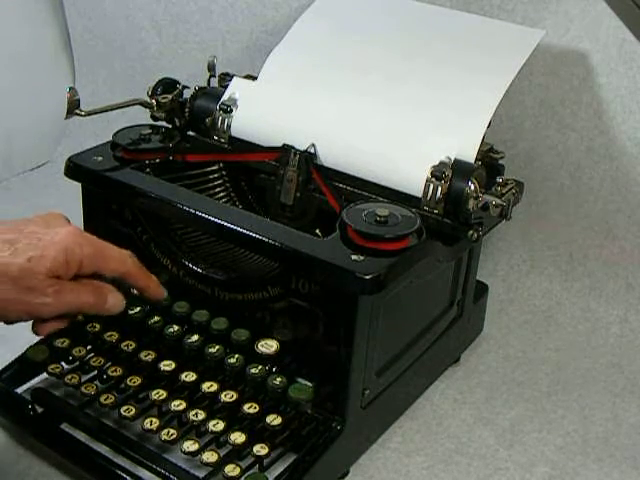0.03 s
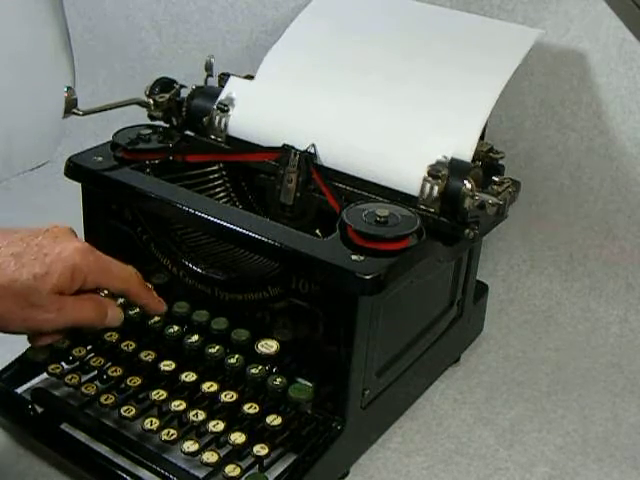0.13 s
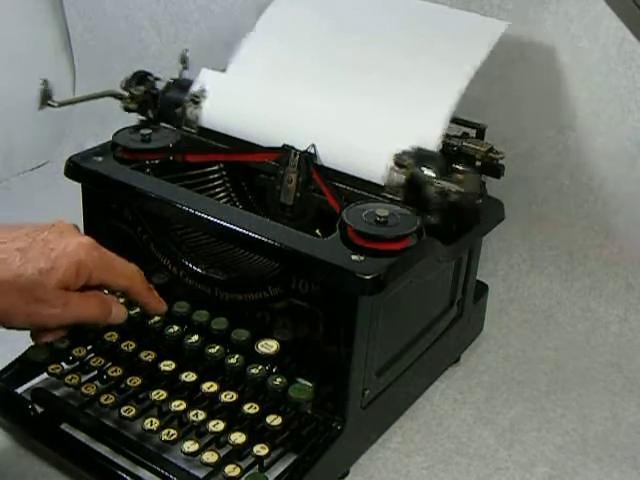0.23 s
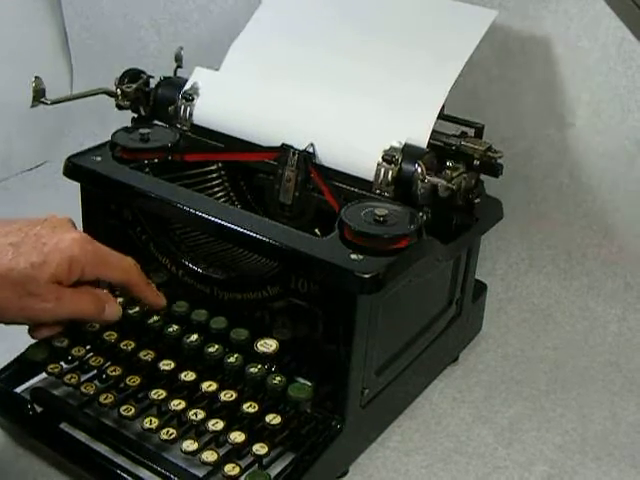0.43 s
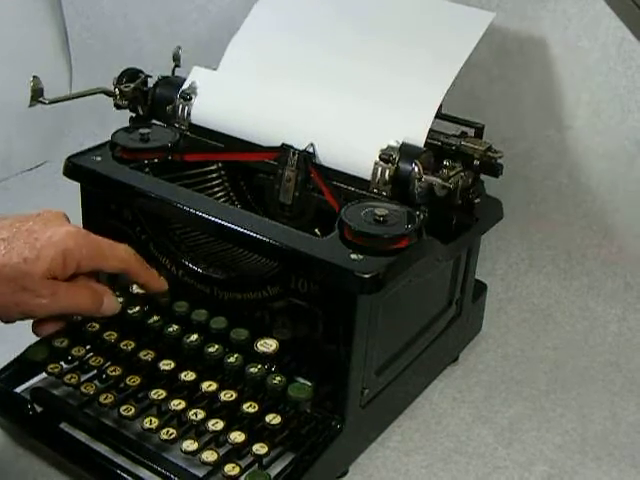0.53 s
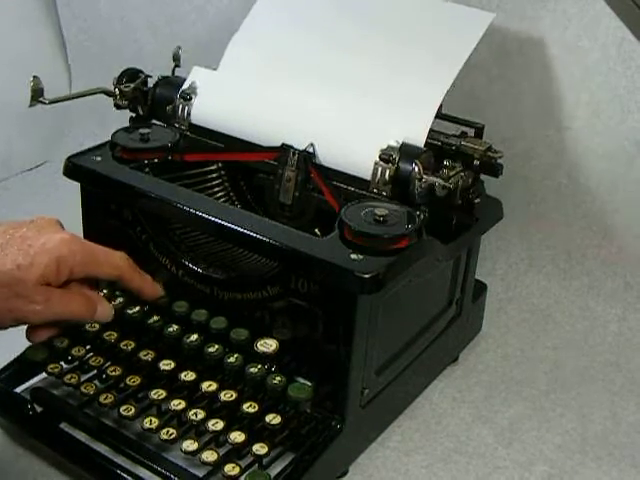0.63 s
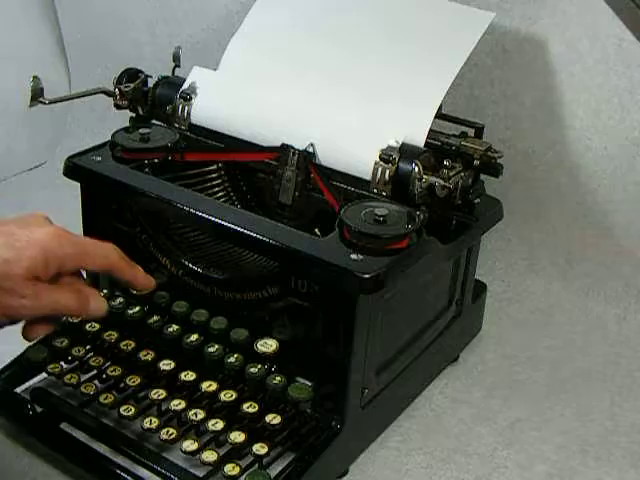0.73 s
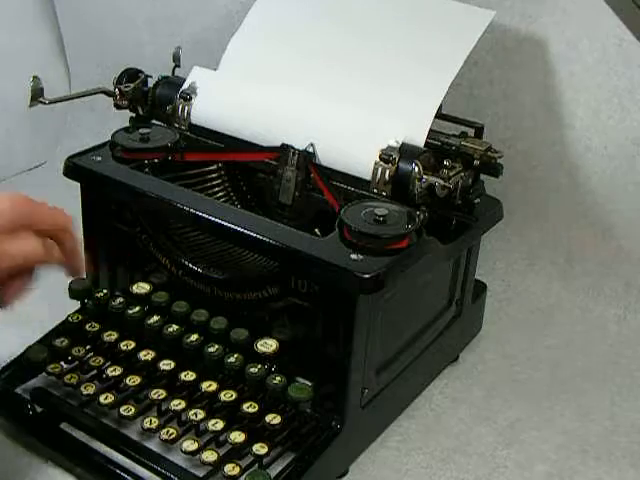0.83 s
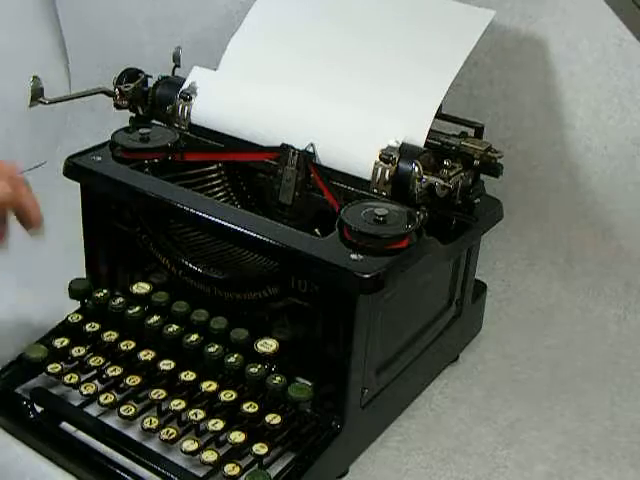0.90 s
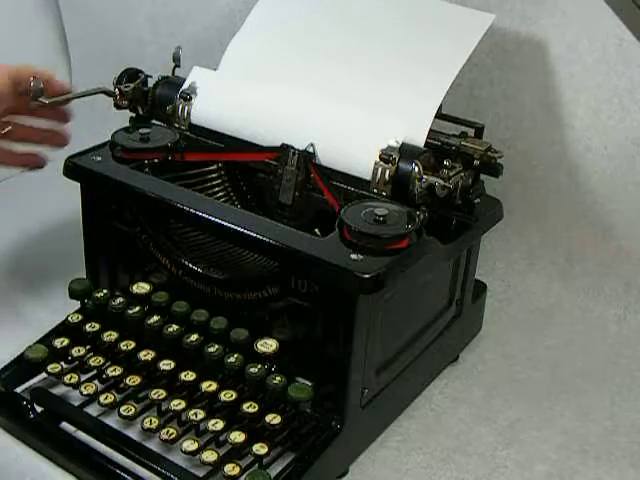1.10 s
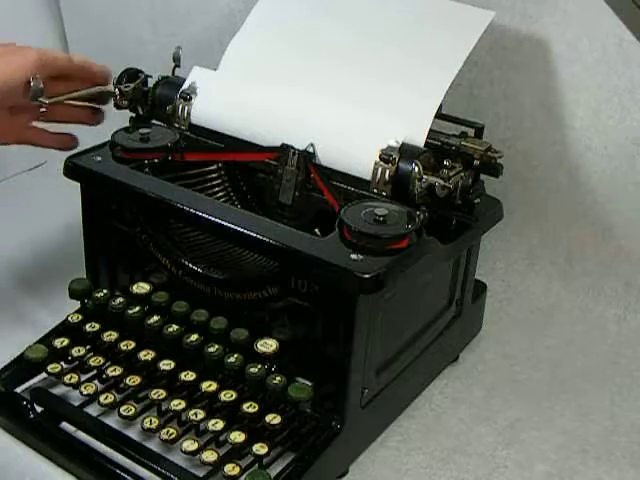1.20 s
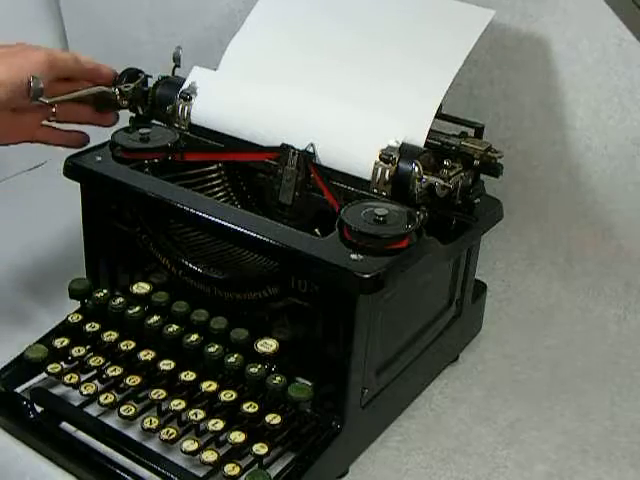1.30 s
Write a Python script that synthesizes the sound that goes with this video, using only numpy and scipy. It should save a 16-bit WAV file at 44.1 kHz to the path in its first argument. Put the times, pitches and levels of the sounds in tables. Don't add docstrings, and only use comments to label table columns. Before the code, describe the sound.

Typewriter key and carriage action: a sharp click, quick ratcheting rattle, a heavy double clack, then another hard clunk, followed by weak ticks and low room murmur, heard through a dull, gritty, low-quality camera microphone.

```python
import sys
import numpy as np
from scipy import signal
from scipy.fft import rfft, irfft, next_fast_len
from scipy.io import wavfile

SR = 44100
rng = np.random.default_rng(int(sys.argv[2]) if len(sys.argv) > 2 else 0)


def level_to_linear(level):
    exponent = np.asarray(level, float) / 20
    return 10 ** exponent


def persist_wave(psi):
    counts = np.round(np.clip(psi, -1, 1) * 32767).astype(np.int16)
    wavfile.write(sys.argv[1], SR, np.atleast_2d(counts).T)


N = 59535

# start in seconds, peak in dB, pitch of the crack in Hz, push into the frame in dB.
BLOWS = [(0.175, -42.5, 1170, -34), (0.2045, -20, 1617, -49.5), (0.209, -21.5, 2740, -34),
         (0.2072, -22, 3445, -41.5), (0.2069, -25, 876, -44), (0.2067, -26.5, 4600, -42),
         (0.2379, -21, 1190, -29.5), (0.257, -23.5, 1250, -32), (0.3048, -29, 2150, -34),
         (0.3276, -27, 1770, -28.5), (0.361, -32.5, 2420, -24.5), (0.3956, -8.5, 2116, -20),
         (0.4111, -12, 1200, -17), (0.43, -21, 1273, -23), (0.463, -21.5, 2580, -32),
         (0.512, -28.5, 1047, -22.5), (0.5856, -25.5, 2490, -43.5), (.6110, -25.5, 2840, -38),
         (.6290, -8, 1436, -13), (0.6421, -29, 2570, -22), (0.6628, -27.5, 1365, -23.5),
         (0.738, -34, 2240, -39), (0.7857, -46, 1970, -33.5), (0.809, -39.5, 1955, -40.5),
         (0.82, -42.5, 1440, -37), (0.8223, -43.5, 3160, -48), (0.8785, -41.5, 2007, -43),
         (0.9185, -46.5, 1890, -42), (1.0235, -52.5, 1550, -40), (1.115, -38, 1770, -42.5),
         (1.18, -38.5, 1641, -51)]
# start in seconds, pitch in Hz, level in dB,
# time to fade by 60 dB in seconds.
PART_RINGS = [(.06, 160, -45, 0.27), (0.34, 170, -25, 0.45), (.240, 527, -25, 0.14), (.245, 705, -31, 0.18),
              (.35, 170, -25, 0.13), (0.44, 180, -20.5, .2), (.41, 645, -20.5, .12),
              (.52, 175, -26.5, 0.55), (0.87, 59, -34.5, .25), (.515, 350, -20.5, .15),
              (0.215, 1030, -27.5, 0.23), (.408, 600, -12.5, 0.15), (0.424, 395, -9.5, 0.08),
              (0.53, 560, -26, 0.16), (0.5, 364, -22.5, 0.18), (.45, 452, -18.5, 0.16),
              (.50, 452, -26, 0.56), (0.46, 390, -18.5, .1), (.41, 232, -22, 0.18), (.56, 292, -31, .3),
              (.42, 1150, -24, 0.28), (.50, 930, -37.5, 1.9), (.636, 166, -15.5, 0.12),
              (.634, 228, -18, 0.15), (.629, 720, -20.5, 0.11), (.632, 1100, -18, 0.071),
              (.632, 1400, -20, 0.13), (.632, 450, -20, 0.14), (.64, 520, -23, 0.13),
              (0.58, 290, -19.5, 0.14), (0.66, 205, -31, 0.24), (.92, 255, -37, 0.36),
              (1.02, 290, -40.5, 0.19), (.69, 450, -28, 0.6), (0.65, 300, -28, 0.46),
              (0.64, 580, -34.5, .2), (.815, 250, -33, 0.17), (.82, 770, -36, 0.2),
              (0.87, 290, -35.5, 0.48)]
# start in seconds, pitch in Hz, level in dB,
# time to fade by 60 dB in seconds.
LEVER_PINGS = [(0.2043, 1680, -31, 0.026), (.2080, 1910, -23, 0.041), (.2085, 3990, -31.5, 0.026),
               (.2085, 4990, -27.5, 0.022), (.2110, 2905, -22, 0.063), (.2200, 2363, -26, 0.091),
               (.242, 2800, -30, 0.046), (.328, 1800, -27, 0.069), (.352, 1766, -29, 0.064),
               (.3955, 1620, -13, 0.029), (.3970, 2410, -9.5, .035), (.408, 1250, -18.5, 0.057),
               (.413, 2484, -22, 0.034), (.430, 2960, -25.5, .03), (.5115, 691, -25.5, 0.076),
               (.5125, 530, -22, .05), (.400, 641, -17.5, .06), (0.4, 331, -17.5, 0.044),
               (.6305, 717, -15, 0.033), (.631, 403, -16, 0.06), (.790, 659.5, -30.5, .06),
               (0.207, 892, -26.5, 0.052), (.612, 2402, -23.5, 0.078), (.6300, 1888, -16, .025),
               (.631, 2510, -21, 0.054), (.739, 3940, -43.5, 0.018), (.8225, 3095, -37, 0.029),
               (.822, 1562, -33, 0.033), (.879, 1998, -40.5, 0.034), (.880, 3000, -44, 0.024),
               (.918, 1883, -40.5, 0.038)]
# time in seconds, load on the frame in dB,
# rattle of the rack above that load in dB.
CARRIAGE_RUN = [(0.165, -69, -2.5), (0.199, -50.5, -20), (0.248, -28, -4), (0.281, -28, -9.5),
                (0.33, -27.5, -4), (0.374, -18.5, -6), (0.422, -19, -5), (0.483, -26.5, -10.5),
                (0.523, -21.5, -16), (.58, -34.5, -6.5), (0.621, -33.5, 4), (0.663, -30, -8),
                (0.721, -38.5, -10.5), (.80, -39.5, -15.5), (0.881, -44.5, -13), (1.0, -53, -16.5)]
# time in seconds, pitch in Hz, level in dB.
RAIL_SONG = [
    (0.205, 338.1, -51),
    (0.213, 338, -35),
    (0.239, 339.6, -37.5),
    (0.249, 346.5, -31.5),
    (0.339, 354.4, -30),
    (0.367, 348.4, -20.5),
    (0.381, 344.3, -25),
    (0.401, 335.6, -25),
    (0.41, 331, -33),
]
# time in seconds, pitch in Hz, level in dB.
RAIL_AFTERSONG = [
    (0.655, 338.1, -33),
    (0.671, 335.6, -24),
    (0.699, 344.1, -26),
    (0.709, 347.6, -35.5),
    (0.755, 352, -32.5),
    (0.759, 353.2, -40.5),
    (1.019, 350.6, -50.5),
    (1.285, 349, -52.5),
    (1.35, 372.4, -57.5),
]
# pitch in Hz, level in dB, time to fade by 60 dB in seconds.
FRAME_MODES = [(110.8, -11, 0.15), (170.3, -4, .11), (229.8, -3.5, 0.088), (297, -6.5, .15),
               (349, -6, 0.092), (375, -5, 0.2), (454, -9.5, 0.1), (510.3, -9, 0.14), (609.6, -8, 0.057),
               (650.5, -11.5, 0.06), (711, -15.5, 0.049), (790, -15.5, 0.037), (890, -21, 0.04),
               (1031, -13.5, 0.041)]
# pitch in Hz, level in dB, time to fade by 60 dB in seconds.
STEEL_MODES = [(1157, -6.5, 0.068), (1263, -6, 0.082), (1366, -7, 0.053), (1478, -8, 0.024),
               (1770, -3.5, 0.041), (2007, -3, 0.074), (2372, -4, 0.053), (2465, -3.5, 0.051),
               (2600, -6, 0.055), (2762, -8.5, 0.07), (2882, -8, .05), (3192, -11.5, 0.045),
               (3540, -14.5, 0.015), (4280, -19.5, 0.032)]
# frequency in Hz, level in dB per Hz.
SNAP_COLOUR = [(180, -31), (300, -5), (586, -0.5), (844, -3), (2460, -8.5), (3180, -12), (4870, -28),
               (5500, -33), (7150, -63), (12100, -120)]
# frequency in Hz, level in dB.
KNOCK_COLOUR = [(59, -72.5), (100, -17.5), (165, -4), (522, -5.5), (617, -4.5), (779, -6.5), (2510, -17),
                (5400, -36.5), (7020, -72), (11900, -120)]
# frequency in Hz, level in dB per Hz.
RACK_COLOUR = [(700, -32), (1500, -3), (2500, 0), (3500, -9), (5000, -27), (7000, -60)]
# frequency in Hz, level in dB.
MURMUR_COLOUR = [(35, -33.5), (60, -16), (151, -1.5), (716, -10.5), (981, -23), (1100, -11.5),
                 (2060, -14.5), (5000, -26.5), (6500, -53), (11000, -120)]
# pitch in Hz, width in Hz, level in dB, gone by in seconds.
MURMUR_RINGS = [(2100, 98, -58.5, 0.2), (3290, 120, -60, 0.19), (347, 45, -54, 9.0),
                (835, 250, -53.5, 0.33), (111.6, 99, -58, 9.0)]


def rms_one(x):
    return x / np.sqrt(np.mean(x ** 2) + 1e-20)


def ring(force, hz, t60):
    shrink = level_to_linear(-60 / (t60 * SR))
    turn = 2 * np.pi * hz / SR
    return signal.lfilter([0, np.sin(turn)], [1, -2 * shrink * np.cos(turn), shrink ** 2], force + 1e-18)


def colour(x, points):
    edges = 25 * 2 ** np.arange(0, 8, 1 / 3)
    table_hz, table_db = np.transpose(points)
    out = 0
    for k, (low, high) in enumerate(zip(edges, edges[1:])):
        middle = np.log(low * high) / 2
        level = level_to_linear(np.interp(middle, np.log(table_hz), table_db))
        sos = signal.butter(2, [low, high], "band", fs=SR, output="sos")
        out = out + level * (-1) ** k * signal.sosfilt(sos, x + 1e-18)
    return out


def clicks(per_s, spread_db):
    sizes = level_to_linear(spread_db * np.minimum(rng.exponential(1, N), 4)) * rng.choice([-1, 1], N)
    return rms_one(sizes * (rng.random(N) < per_s / SR))


def body(modes, force):
    out = 0
    for hz, db, t60 in modes:
        share = np.repeat(rng.standard_normal(N // 64 + 1), 64)[:N]
        gain = level_to_linear(db) / np.sqrt(t60 * SR / 4 / np.log(1000))
        out = out + gain * ring(force * share, hz, t60)
    return out


def contacts():
    chatter_t60_s, front_db, front_t60_s = 0.18, 4.5, 0.03
    push_t60_s, push_rise_s = 0.081, 0.0025
    half_width = 0.65 / 2
    t = np.arange(N) / SR
    chatter = clicks(4000, 1.8)
    crack, sharp, push = 0, 0, 0
    for s, db, hz, push_db in BLOWS:
        age = np.maximum(t - s, 0)
        fade = level_to_linear(-60 * age / chatter_t60_s) + level_to_linear(front_db - 60 * age / front_t60_s)
        burst = (t >= s) * level_to_linear(db) * fade * chatter
        band = [hz * (1 - half_width), hz * (1 + half_width)]
        sos = signal.butter(2, band, "band", fs=SR, output="sos")
        crack = crack + signal.sosfilt(sos, burst + 1e-18) * np.sqrt(SR / 4 / half_width / hz)
        sharp = sharp + burst
        push = push + level_to_linear(push_db - 60 * age / push_t60_s) * np.minimum(age / push_rise_s, 1) * chatter
    steel = level_to_linear(-26) * body(STEEL_MODES, sharp)
    snap = level_to_linear(-16) * colour(sharp, SNAP_COLOUR)
    frame = level_to_linear(-8.5) * body(FRAME_MODES, push)
    knock = level_to_linear(12) * colour(push, KNOCK_COLOUR)
    return level_to_linear(-18.5) * crack + steel + snap + frame + knock


def slams():
    onset_s, wobble_db, wobbles_per_s = 0.0045, 2.5, 30
    t, out = np.arange(N) / SR, 0
    knots = np.arange(100) / wobbles_per_s
    for s, hz, db, t60 in PART_RINGS:
        age = np.maximum(t - s, 0)
        turn = rng.random()
        wobble = wobble_db * np.interp(t, knots, rng.standard_normal(100))
        level = level_to_linear(db - 60 * age / t60 + wobble) * (1 - np.exp(-age / onset_s))
        out = out + level * np.sin(2 * np.pi * (hz * age + turn))
    return out


def pings():
    onset_s = 0.0011
    t, out = np.arange(N) / SR, 0
    for s, hz, db, t60 in LEVER_PINGS:
        age = np.maximum(t - s, 0)
        level = level_to_linear(db - 60 * age / t60) * (1 - np.exp(-age / onset_s))
        out = out + level * np.sin(2 * np.pi * hz * age)
    return out


def carriage():
    s, load_db, rattle_db = np.transpose(CARRIAGE_RUN)
    t = np.arange(N) / SR
    load = np.interp(t, s, load_db, left=-90, right=-90)
    ticks = clicks(1600, 3) * level_to_linear(load)
    rattle = ticks * level_to_linear(np.interp(t, s, rattle_db))
    frame = level_to_linear(-10.5) * body(FRAME_MODES, ticks)
    steel = level_to_linear(-20) * body(STEEL_MODES, rattle)
    rumble = level_to_linear(12) * colour(rattle, KNOCK_COLOUR)
    teeth = level_to_linear(2) * colour(rattle, RACK_COLOUR)
    rail_hum = body([(345, -21, 0.11)], ticks)
    return frame + steel + rumble + teeth + rail_hum


def rail_song(curve):
    s, hz, db = np.transpose(curve)
    t = np.arange(N) / SR
    outside_s = np.maximum(s[0] - t, 0) + np.maximum(t - s[-1], 0)
    level_db = np.interp(t, s, db) - 1500 * outside_s
    cycles = np.cumsum(np.interp(t, s, hz)) / SR
    return np.sqrt(2) * level_to_linear(level_db) * np.sin(2 * np.pi * cycles)


def room(x):
    t60_s, wall_cut_hz = 0.45, 5100
    size = next_fast_len(N + SR)
    turn = np.exp(-2j * np.pi * np.arange(size // 2 + 1) / size)
    dull = np.exp(-2 * np.pi * wall_cut_hz / SR)
    total = 0
    lags = (rng.uniform(0.009, 0.04, 10) * SR).astype(int)
    for k, lag in enumerate(lags):
        loop = level_to_linear(-60 * lag / SR / t60_s) * (1 - dull) / (1 - dull * turn) * turn ** lag
        total = total + (-1) ** k * loop / (1 - loop)
    return irfft(rfft(x, size) * total, size)[:N]


def murmur():
    t = np.arange(N) / SR
    out = level_to_linear(-49) * rms_one(colour(rng.standard_normal(N + SR), MURMUR_COLOUR)[SR:])
    for hz, width_hz, db, gone_s in MURMUR_RINGS:
        tone = rms_one(ring(rng.standard_normal(N), hz, 2.2 / width_hz))
        out = out + level_to_linear(db) * np.clip((gone_s - t) / 0.04, 0, 1) * tone
    return out


def scene():
    machine = contacts() + slams() + pings() + carriage() + rail_song(RAIL_SONG) + rail_song(RAIL_AFTERSONG)
    return (machine + level_to_linear(-20) * room(machine) + murmur())[None]


def top_cut(x):
    return signal.sosfilt(signal.butter(12, 15850, fs=SR, output="sos"), x)


def record(dry):
    step, offset, thin = 1 / 128 / np.sqrt(2), -0.0104, 4
    click_s, click_height, click_fade_s = 0.787, 0.036, 0.0004
    heard = signal.sosfilt(signal.butter(2, 78.2, "high", fs=SR, output="sos"), dry)
    slow = signal.resample_poly(heard, 1, thin, axis=1)
    coarse = step * np.round((slow + offset) / step)
    taps = signal.firwin(numtaps=151, cutoff=5540, window=("kaiser", 9), fs=SR)
    full = signal.resample_poly(coarse, thin, 1, axis=1, window=taps, padtype="reflect")[:, :N]
    age = np.arange(N) / SR - click_s
    click = click_height * (age >= 0) * np.exp(-np.maximum(age, 0) / click_fade_s)
    return top_cut(full + click)


dry = scene()
out = record(dry)
persist_wave(out)
```